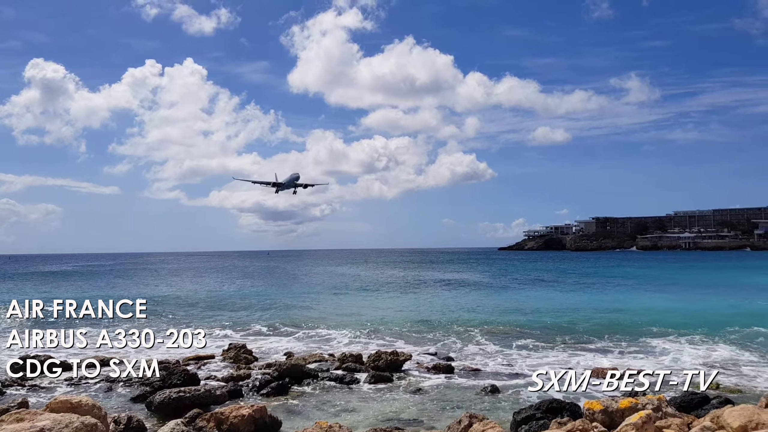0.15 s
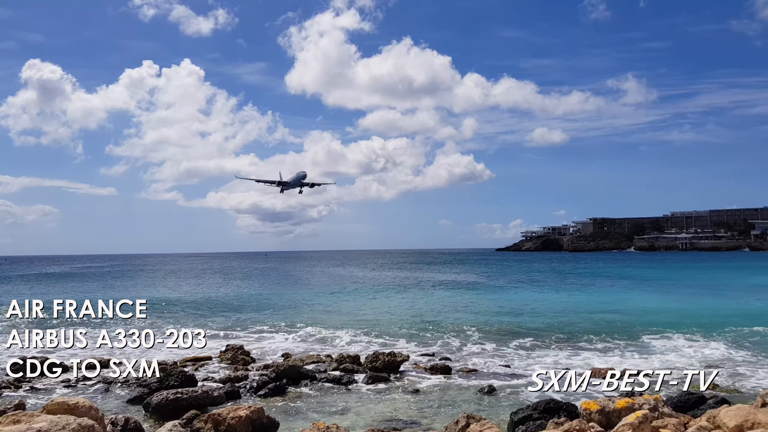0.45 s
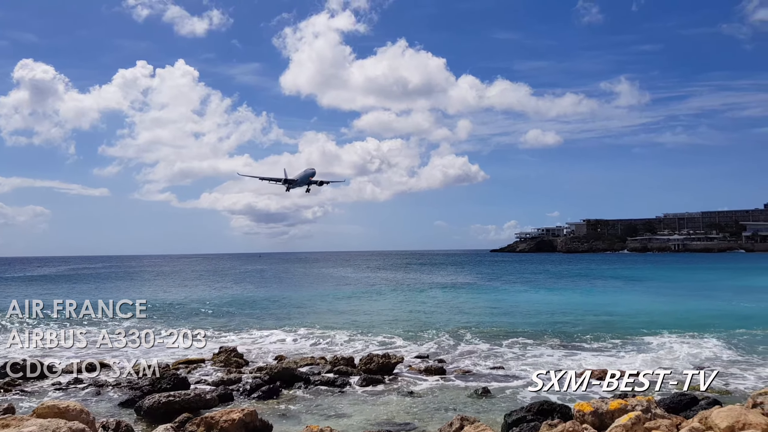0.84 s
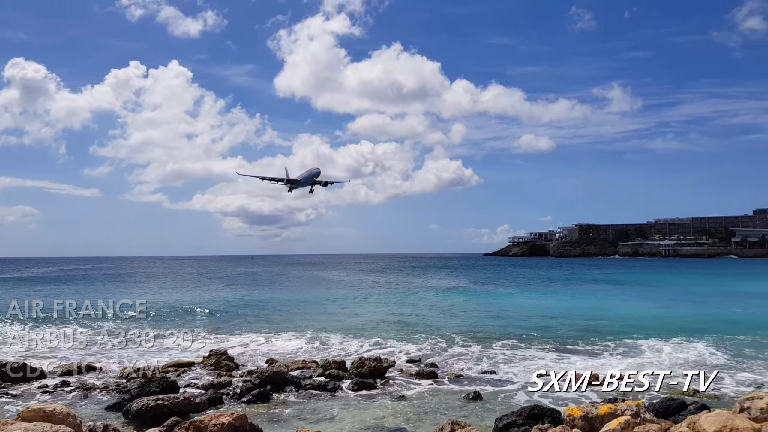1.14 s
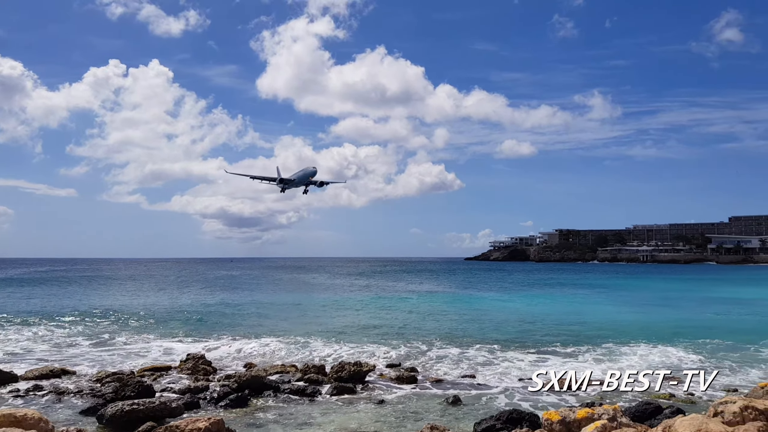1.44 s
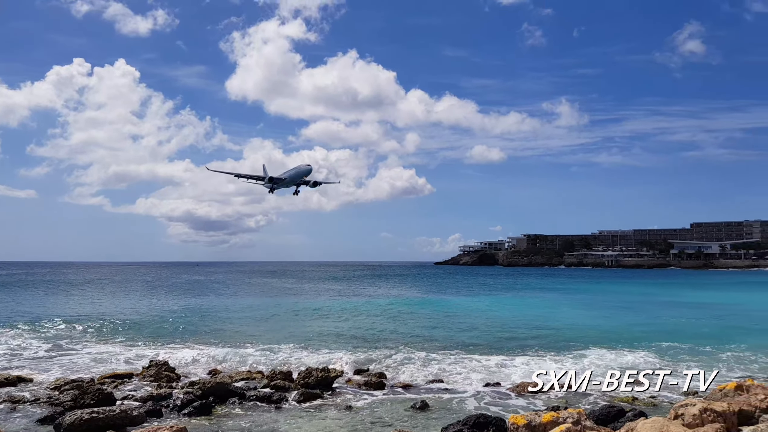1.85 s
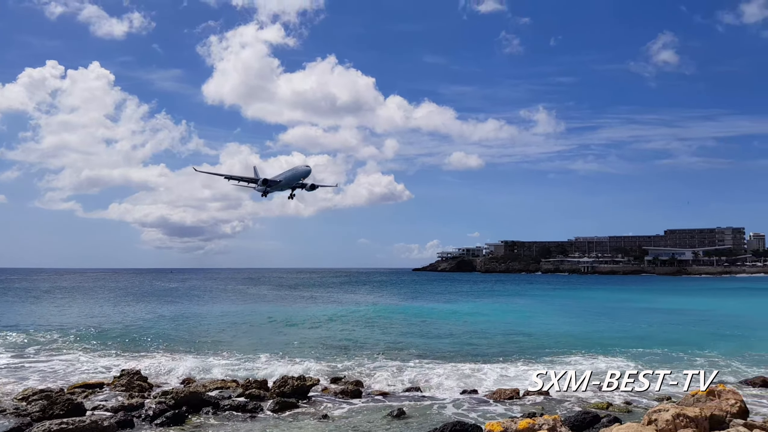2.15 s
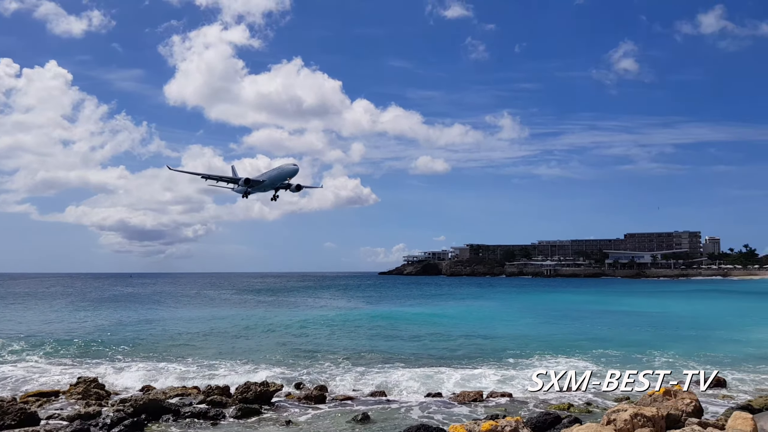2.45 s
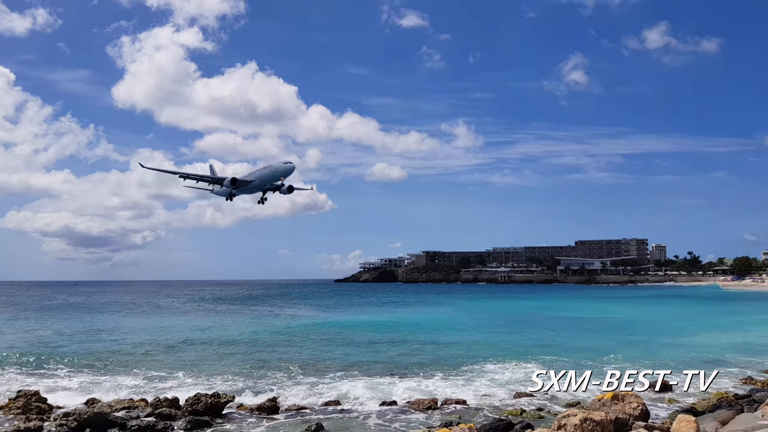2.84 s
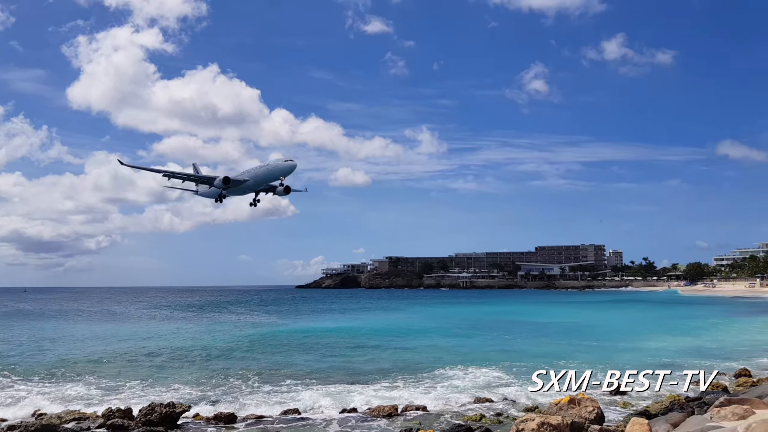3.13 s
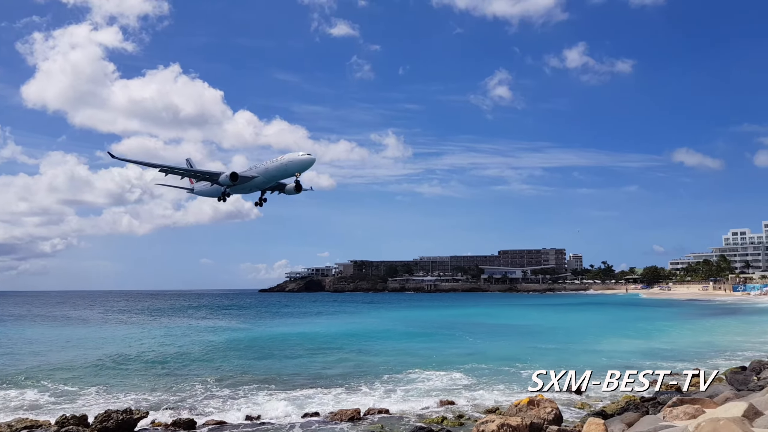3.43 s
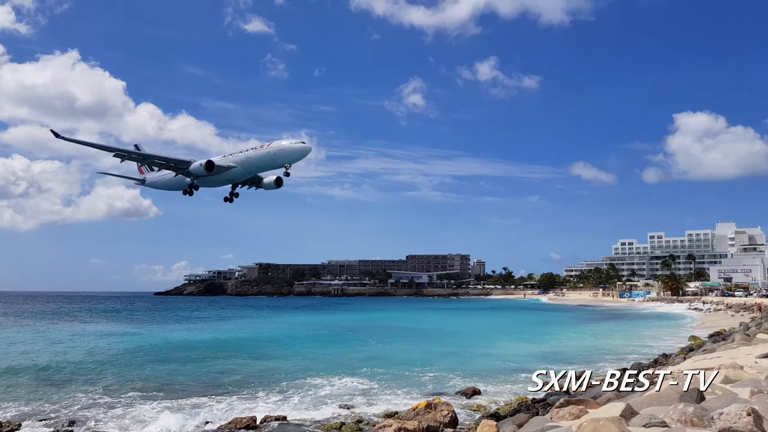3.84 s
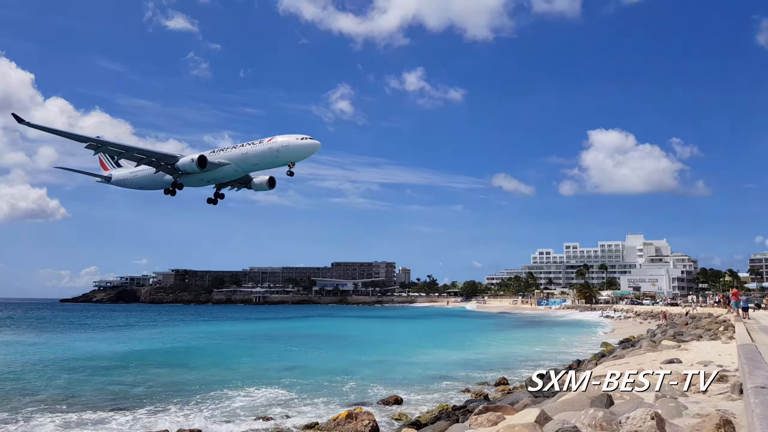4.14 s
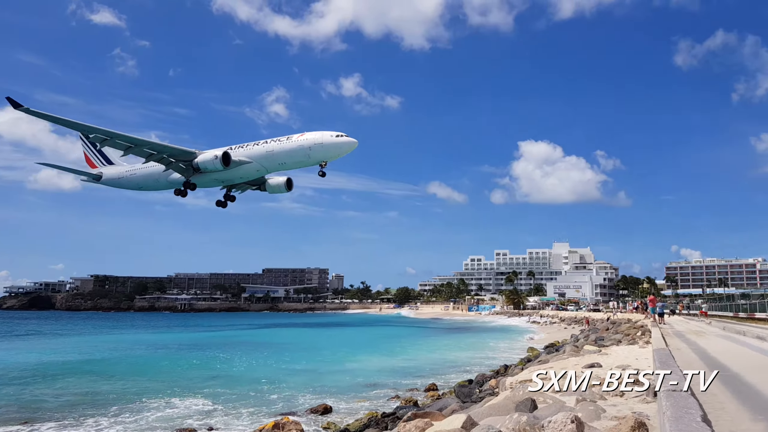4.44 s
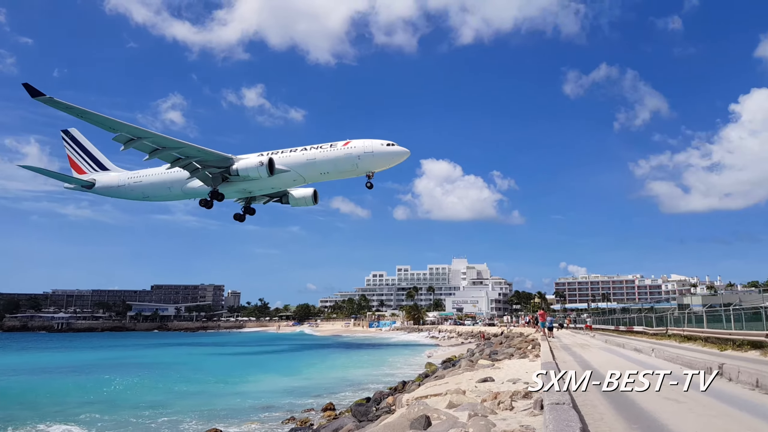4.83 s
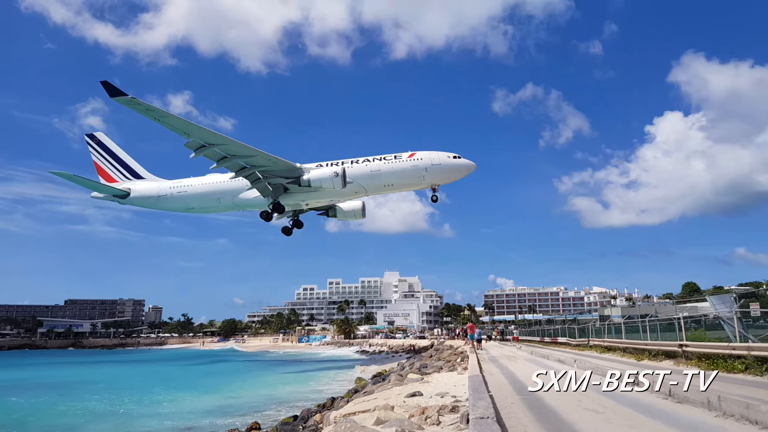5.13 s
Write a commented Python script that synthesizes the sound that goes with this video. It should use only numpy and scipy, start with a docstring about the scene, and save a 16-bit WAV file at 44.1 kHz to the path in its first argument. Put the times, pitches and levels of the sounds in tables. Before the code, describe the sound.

On a beach, uneven wind rumbles and sputters against the microphone over a gentle wash of waves. An incoming jet airliner sends out a wavering, high whine that sinks in pitch as the engine noise brightens. The whine drops out as the plane passes low overhead, leaving a broad roar that peaks and then recedes. Everything is heard mostly on the right side.

```python
"""A twin-jet airliner on approach passes low over a windy beach. Its compressor whine glides with
throttle and Doppler shift, then gives way to exhaust roar; air dulls the far sound and turbulence
makes it flicker. A low roar under the jet ends in a swell of gust or wave. Surf lays a soft bed,
while wind buffets and sputters across two microphone ports, the left one much weaker."""
import sys
import numpy as np
from scipy import signal
from scipy.fft import rfft, irfft, next_fast_len
from scipy.io import wavfile
from scipy.ndimage import uniform_filter1d, minimum_filter1d, map_coordinates

SR = 44100
rng = np.random.default_rng(int(sys.argv[2]) if len(sys.argv) > 2 else 0)


def generate_wav(sig):
    """Save sig (samples, or channels by samples) to the path in sys.argv[1] as 16-bit PCM at SR."""
    pcm = np.round(np.clip(np.atleast_2d(sig).T, -1, 1) * 32767).astype(np.int16)
    wavfile.write(sys.argv[1], SR, pcm)


N = 360738
TIME = np.arange(N) / SR

# Colour of the surf hiss: freq_hz, relative_db
SURF_COLOUR = [(300, -28), (1000, 8), (3000, -9), (7000, -24), (11000, -22), (15700, -27)]
# Gusts hitting the ports: time_s, level_db
BUFFET_LEVEL = [(0.0, -41), (0.07, -41), (0.14, -30), (0.21, -31), (0.28, -39.0), (0.35, -36), (0.42, -45),
                (0.49, -34), (0.56, -34.5), (0.63, -34.0), (0.7, -34), (0.77, -37), (0.84, -26.5),
                (0.91, -36.5), (0.98, -37), (1.05, -32.5), (1.12, -33), (1.19, -43.5), (1.26, -45.0),
                (1.33, -32), (1.4, -40.5), (1.47, -33.0), (1.54, -34), (1.61, -32.0), (1.68, -32.5),
                (1.75, -36), (1.82, -30), (1.89, -37.0), (1.96, -37), (2.03, -35), (2.1, -34), (2.17, -41),
                (2.24, -36), (2.31, -48), (2.38, -36.5), (2.45, -32), (2.52, -44), (2.59, -36.5),
                (2.7, -45), (2.84, -41), (2.98, -38), (3.12, -41), (3.26, -35.5), (3.4, -36.0), (3.54, -37),
                (3.68, -34), (3.82, -44), (3.96, -48.5), (4.1, -34), (4.24, -33.5), (4.38, -46),
                (4.52, -37), (4.66, -40), (4.8, -43), (4.94, -39), (5.08, -40), (5.22, -40.0),
                (5.36, -38.5), (5.5, -38), (5.64, -43), (5.78, -35), (5.92, -41), (6.06, -38), (6.2, -37.5),
                (6.34, -42), (6.48, -46), (6.62, -43), (6.76, -36), (6.9, -37.5), (7.04, -38),
                (7.18, -39.5), (7.32, -37), (7.46, -42.5), (7.6, -56.0), (7.74, -40.5), (7.88, -37),
                (8.02, -40), (8.16, -36)]
# Low thud of the buffeting: freq_hz, relative_db
BUFFET_COLOUR = [(20, -25), (45, -4.5), (70, -0.5), (120, -3), (250, -9.5), (600, -20.5), (1200, -47),
                 (2500, -120)]
# Sputter riding on the buffet level: time_s, offset_db
SPUTTER_OFFSET = [(0, -3), (1, -4), (2, -4.5), (3.4, -5), (4.5, -7.5), (6, -7), (8.18, -18)]
# Midrange rasp of the sputter: freq_hz, relative_db
SPUTTER_COLOUR = [(80, -35), (200, -4), (600, -6), (1400, -7), (2500, -23), (5000, -120)]

# The pass overhead: time_s, air_loss_at_10khz_db, exhaust_share, left_lead_samples
FLIGHT_PATH = [(0, 29, 0, 7.5), (.5, 22, 0, 4.5), (1, 20, 0.37, 10.5), (1.5, 21, 0, 5), (2, 9, 0.25, 9.5),
               (2.5, 11, 0.16, 8), (3, 8, 0.5, 7.5), (3.6, 6, 0.1, 7.5), (4.2, -0.2, 0, 8), (5, -3, .1, 6),
               (5.5, 1.2, 0.27, 6.5), (6, 0.5, 1, -3), (6.8, 0, 1, -1.5), (7.05, -1.5, 1, -0.5),
               (7.2, 2.5, 1, -4), (7.6, 6.5, 0.5, -5), (8.18, 3.5, 1, 1)]
# Engine noise and the low roar under the jet, which ends in a swell of gust or wave.
# Levels before trim and flicker: time_s, engine_db, low_roar_db
ROAR_LEVELS = [(0.0, -31.5, -40), (0.15, -35, -41), (0.3, -34, -37.5), (0.45, -37, -40.5),
               (0.6, -32.5, -40), (0.75, -33.5, -40), (0.9, -27, -32), (1.05, -29.5, -39.5),
               (1.2, -30, -39), (1.35, -31, -37.5), (1.5, -27, -37), (1.65, -28.0, -31.5),
               (1.8, -31.0, -36.5), (1.95, -31.5, -41), (2.1, -29, -40.0), (2.25, -29.5, -38.5),
               (2.4, -29, -37), (2.55, -29.5, -35.5), (2.7, -31.0, -41.5), (2.85, -30, -42.0),
               (3.0, -27.5, -37.5), (3.15, -33.5, -41.5), (3.3, -33.5, -37.0), (3.45, -29.5, -32.5),
               (3.6, -29, -42.5), (3.75, -29.0, -38), (3.9, -29.0, -43), (4.05, -29.5, -37),
               (4.2, -27.5, -35), (4.35, -28, -35.5), (4.5, -28, -35.5), (4.65, -28.5, -40.5),
               (4.8, -29, -37.5), (4.95, -29, -38), (5.1, -30.5, -35), (5.25, -28, -36), (5.4, -27, -34),
               (5.55, -28.0, -31), (5.7, -27.5, -35.0), (5.85, -27.0, -33.5), (6.0, -26.0, -33.0),
               (6.15, -25.0, -30.5), (6.3, -26, -36), (6.45, -25, -32), (6.6, -24.5, -31.5),
               (6.75, -28.0, -33.5), (6.9, -29.5, -37.5), (7.05, -29, -37.5), (7.2, -32.0, -43),
               (7.35, -34.5, -38), (7.5, -35.0, -39), (7.65, -37, -42.5), (7.8, -38.5, -42.5),
               (7.95, -40, -55), (8.07, -41.5, -38.5), (8.18, -42.5, -36)]
# Engine noise from the front: freq_hz, relative_db
INLET_COLOUR = [(500, -40), (850, -14.5), (1180, 2.5), (1770, -2), (2610, -4), (2840, -7), (3290, -8),
                (3630, -4.5), (4200, -2.5), (4800, -6.5), (5360, -10.5), (12400, -19), (15700, -35.5)]
# Engine noise from behind: freq_hz, relative_db
EXHAUST_COLOUR = [(500, -26), (850, -3.5), (926, -13.5), (1130, -1.5), (1950, -0.5), (2950, -1), (3250, -5),
                  (4860, -1), (8510, -15), (11800, -20.5), (15700, -23)]
# Colour of the low roar: freq_hz, relative_db
LOW_ROAR_COLOUR = [(150, -18), (250, -14.5), (476, -2), (611, -1), (775, -6), (1000, -4.5), (1300, -6),
                   (2200, -120)]
# Tones behind the engines: start_s, end_s, first_hz, last_hz, width_hz, first_db, last_db
AFT_TONES = [(5.694, 5.946, 2780, 2700, 15, -34, -28), (6.0, 7.51, 2945, 3010, 17.5, -36, -48),
             (6.284, 7.5, 1990, 2045, 32, -39, -48), (6.25, 6.622, 615, 625, 170, -31, -33),
             (6.75, 7.45, 70.5, 72.4, 13, -38, -37.5), (7.8, 8.4, 74.1, 71.4, 9, -35, -38)]
# Glide of the whine, the fan's third harmonic: time_s, pitch_hz
WHINE_PITCH = [(0.0, 4223), (0.2, 4272), (0.4, 4330), (0.6, 4384), (0.8, 4423), (1.0, 4430), (1.2, 4388),
               (1.4, 4334), (1.6, 4268), (1.8, 4190), (2.0, 4112), (2.2, 4085), (2.4, 4019), (2.6, 3944),
               (2.8, 3891), (3.0, 3845), (3.2, 3811), (3.4, 3795), (3.6, 3768), (3.8, 3755), (4.0, 3775),
               (4.2, 3753), (4.4, 3722), (4.6, 3711), (4.8, 3648), (5.0, 3566), (5.2, 3469), (5.4, 3355)]
# Tuning of the five main whine lines: pitch_ratio
WHINE_RATIOS = [1, .961, 1.295, 1.334, 1.45]
# Balance of those lines: time_s, then one level_db per line
WHINE_LEVELS = [(0.0, -31.5, -40, -60, -60, -61), (0.14, -31, -43, -60, -55, -51),
                (0.28, -32.5, -44, -60, -57, -58), (0.42, -33, -59, -62, -63, -59),
                (0.56, -27, -41, -58, -58, -58), (0.7, -29.5, -38, -56, -60, -58),
                (0.84, -30, -34, -55, -57, -56), (0.98, -28.5, -34.5, -45, -54, -57),
                (1.12, -28.5, -34, -57, -60, -56), (1.261, -31, -35, -46, -59, -46),
                (1.4, -39, -40, -63, -56, -58), (1.54, -28.5, -29, -54, -58, -53),
                (1.68, -29, -36, -50, -50, -54), (1.82, -26.5, -38, -56, -52, -46),
                (1.96, -23, -41, -50, -54, -54), (2.1, -24.5, -36, -52, -44, -48),
                (2.24, -25.5, -39, -56, -45, -44), (2.38, -25.5, -27, -49, -46, -47),
                (2.52, -23, -26.5, -47, -53, -46), (2.66, -19.5, -29, -47, -48, -51),
                (2.8, -19.5, -27, -45, -53, -37), (2.94, -30.5, -35, -45, -51, -40),
                (3.08, -30, -35, -47, -60, -41.5), (3.22, -38, -36, -39, -54, -47),
                (3.36, -33, -40, -50, -55, -42), (3.5, -40, -29.5, -42, -44, -46),
                (3.64, -35, -38, -36, -47, -45), (3.78, -26, -45, -36, -39, -41),
                (3.92, -23.5, -45, -30, -36, -47), (4.06, -35, -45, -29.5, -41, -46),
                (4.2, -35, -42, -29.5, -33, -47), (4.34, -30, -37, -31, -33.5, -47),
                (4.48, -28.5, -46, -38, -32, -49), (4.62, -34.5, -44, -44, -36, -56),
                (4.76, -34, -48, -36, -41, -56), (4.9, -40, -46, -40, -37, -57),
                (5.04, -34, -45, -33, -42, -55), (5.18, -46, -54, -44, -47, -55),
                (5.32, -44, -60, -48, -60, -60)]
# Turbulence smearing each line into a wide skirt: time_s, width_hz, skirt_share
WHINE_SPREAD = [(0, 10, .12), (1.5, 14, .22), (2.6, 9, .22), (3.4, 16, .1), (4.2, 130, .08), (5.4, 70, .08)]
# Tuning of the faint whine lines: pitch_ratio
FAINT_RATIOS = [1.588, .333, .667, 1.785, 1.785]
# Cue for each faint line: level_db, start_s, end_s
FAINT_CUES = [(-58, .65, 1.2), (-46, 1.9, 3.3), (-49, .8, 2.9), (-64, .5, 2.4), (-54, 2.4, 4.6)]

# How alike the aircraft sounds at both ports: freq_hz, likeness_share
PORT_LIKENESS = [(100, 0.8), (600, .6), (2000, 0.5), (5000, 0.66), (9000, .2)]
# Loss at the weak left port: freq_hz, gain_db
LEFT_PORT_EQ = [(60, -10.5), (180, -14), (550, -16), (1650, -15.0), (4970, -14.5), (15000, -11.5)]
# Colour of the microphone: freq_hz, gain_db
CAPSULE_EQ = [(6000, 0), (8800, -1), (11800, -0.5), (13500, 1), (15700, -1.5)]


def amp(db):
    """Gain of a level in dB."""
    return 10 ** (np.asarray(db) / 20)


def unit(x):
    """x at rms 1."""
    return x / np.sqrt(np.mean(np.abs(x) ** 2) + 1e-20)


def along(points, hz):
    """An EQ-style curve, read at hz on a log axis."""
    freqs, values = np.transpose(points)
    return np.interp(np.log(hz + 1), np.log(freqs + 1), values)


def curves(rows, t=TIME):
    """One automation curve for each column after the time."""
    times, *columns = np.transpose(rows)
    return [np.interp(t, times, column) for column in columns]


def wobble(rate):
    """A smooth random curve; rate knots a second, steady or moving."""
    place = np.cumsum(np.broadcast_to(rate, N)) / SR
    return map_coordinates(rng.standard_normal(int(place[-1]) + 4), [place])


def span(start, end, fade_s):
    """A gate that opens and closes smoothly."""
    inside_s = np.minimum(TIME - start, end - TIME)
    return np.sin(np.pi / 2 * np.clip(inside_s / fade_s + .5, 0, 1)) ** 2


def filtered(x, response):
    """x through an EQ whose gain is response(hz)."""
    size = next_fast_len(N + SR // 2)
    return irfft(rfft(x, size) * response(np.fft.rfftfreq(size, 1 / SR)), size)[..., :N]


def tone(hz, width_hz, steady):
    """A line whose level and phase drift at random; steady 0-1 of it stays firm."""
    drift = steady + np.sqrt((1 - steady ** 2) / 2) * (wobble(width_hz) + 1j * wobble(width_hz))
    cycles = np.cumsum(np.broadcast_to(hz, N)) / SR
    return np.sqrt(2) * np.real(drift * np.exp(2j * np.pi * cycles))


def rush(colour_db, patchy_db):
    """Two noises whose colour_db(hz, t) moves at constant power, with patches of random gain."""
    hz, t, spectra = signal.stft(rng.standard_normal((2, N)), SR, nperseg=512)
    gain = amp(colour_db(hz[:, None], t)) * np.ones(spectra.shape[1:])
    gain = gain / np.sqrt(np.mean(gain ** 2, axis=0))
    patches = uniform_filter1d(rng.standard_normal(gain.shape), size=10, axis=0)
    patches = unit(uniform_filter1d(patches, size=5, axis=1))
    return signal.istft(spectra * gain * amp(patchy_db * patches), SR, nperseg=512)[1][:, :N]


def surf():
    """Waves wash over the rocks: a smooth hiss all round."""
    return amp(-44 + 1.6 * wobble(1.34)) * rush(lambda hz, t: along(SURF_COLOUR, hz), patchy_db=0)


def wind():
    """Lumpy buffeting with sudden lulls, partly shared by the ports; eddies sputter across them."""
    shared, left, right = filtered(rng.standard_normal((3, N)), lambda hz: amp(along(BUFFET_COLOUR, hz)))
    eddies = wobble(18)
    lulls_db = 9 * np.minimum(eddies + .3, 0)
    lumps = amp(lulls_db + 1.1 * eddies + 1.56 * np.array([wobble(17), wobble(16)]))
    buffet_db, = curves(BUFFET_LEVEL)
    buffet = amp(buffet_db) * unit(lumps * (np.array([left, right]) + 0.72 * shared))
    rasp = unit(filtered(rng.standard_normal((2, N)), lambda hz: amp(along(SPUTTER_COLOUR, hz))))
    ragged_db = 14 * np.tanh((5.5 * eddies + 4.5 * np.array([wobble(25), wobble(25)])) / 12)
    puffs = amp(curves(SPUTTER_OFFSET)[0] + buffet_db) * unit(amp(ragged_db))
    return buffet + puffs * rasp * amp([[1.5], [0]])  # a touch more sputter on the left


def engine_colour(hz, t):
    """Engine noise turns from inlet to exhaust colour; air absorbs the treble with distance."""
    loss_db, exhaust, _ = curves(FLIGHT_PATH, t)
    blend_db = (1 - exhaust) * along(INLET_COLOUR, hz) + exhaust * along(EXHAUST_COLOUR, hz)
    return blend_db - loss_db * (hz / 10230) ** 2.18


def roar():
    """Engine noise and the low roar under it, direct and scattered; eddies shake both together."""
    engine_db, low_roar_db = curves(ROAR_LEVELS)
    depth = 0.48 + 0.033 * np.abs(curves(FLIGHT_PATH)[0])  # a longer path crosses more eddies
    flicker_db = depth * (1.06 * wobble(15) + 0.85 * wobble(30))
    engine = amp(engine_db + 2 + flicker_db) * rush(engine_colour, patchy_db=1.72)
    low_roar_gain = amp(low_roar_db - 0.7 + 2.1 * flicker_db + 0.47 * wobble(20))
    return engine + low_roar_gain * rush(lambda hz, t: along(LOW_ROAR_COLOUR, hz), patchy_db=2)


def aft_tones():
    """Narrow bands that reach the beach once the nozzles point back at it."""
    out = 0
    for start, end, first_hz, last_hz, width_hz, first_db, last_db in AFT_TONES:
        pitch_hz = np.interp(TIME, [start, end], [first_hz, last_hz])
        level_db = np.interp(TIME, [start, end], [first_db, last_db])
        out += amp(level_db) * span(start, end, fade_s=0.32) * tone(pitch_hz, width_hz, steady=0.52)
    return out


def whine():
    """Fan harmonics and compressor blade rows glide together, flickering through turbulent air."""
    pitch_hz, = curves(WHINE_PITCH)
    width_hz, skirt_share = curves(WHINE_SPREAD)
    firm = np.exp(-width_hz / 45)  # wide lines lose their firm core
    out = 0
    for ratio, level_db in zip(WHINE_RATIOS, curves(WHINE_LEVELS)):
        flicker = amp(0.67 * wobble(12))
        core = np.sqrt(1 - skirt_share) * flicker * tone(ratio * pitch_hz, width_hz, steady=firm)
        skirt = np.sqrt(skirt_share) * tone(ratio * pitch_hz, 12 * width_hz, steady=0)
        out += amp(level_db) * (core + skirt)
    for ratio, (level_db, start, end) in zip(FAINT_RATIOS, FAINT_CUES):
        faint = tone(ratio * pitch_hz, 1.1 * width_hz, steady=0.6)
        out += amp(level_db) * span(start, end, fade_s=0.18) * faint
    return out * span(-1, 5.35, fade_s=0.11)


def ports(direct, scattered):
    """Right hears the direct sound; left hears it shifted by the bearing, mixed with scattered sound."""
    lead_samples = curves(FLIGHT_PATH)[2]
    shifted = map_coordinates(direct, [np.arange(N) + lead_samples], mode="nearest")
    focused = filtered(shifted, lambda hz: along(PORT_LIKENESS, hz))
    diffuse = filtered(scattered, lambda hz: np.sqrt(1 - along(PORT_LIKENESS, hz) ** 2))
    return np.array([focused + diffuse, direct])


def scene():
    """The airliner over a bed of surf and wind, in stereo."""
    direct_roar, scattered_roar = roar()
    tones = whine() + aft_tones()
    late_tones = np.roll(tones, SR // 10)  # scattered tones come by longer paths
    return ports(direct_roar + tones, scattered_roar + late_tones) + surf() + wind()


def record(dry):
    """Microphone colour with a weak left port, a limiter on the peaks, then a steep top cut."""
    ceiling, top_hz = .55, 15800
    eq_db = lambda hz: along(CAPSULE_EQ, hz) + np.array([along(LEFT_PORT_EQ, hz), 0 * hz])
    loud = amp(5) * filtered(dry, lambda hz: amp(eq_db(hz)))
    needed_gain = np.minimum(1, ceiling / (np.abs(loud).max(axis=0) + 1e-9))
    smooth_gain = uniform_filter1d(minimum_filter1d(needed_gain, size=401), size=201)
    return filtered(loud * smooth_gain, lambda hz: hz < top_hz)


dry = scene()
out = record(dry)
generate_wav(out)
```